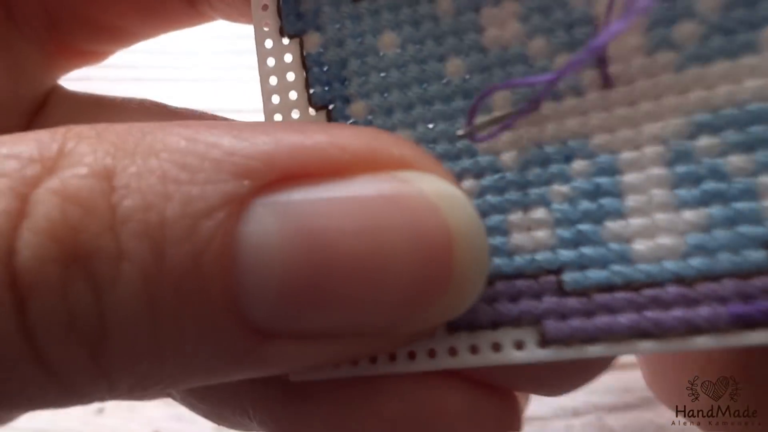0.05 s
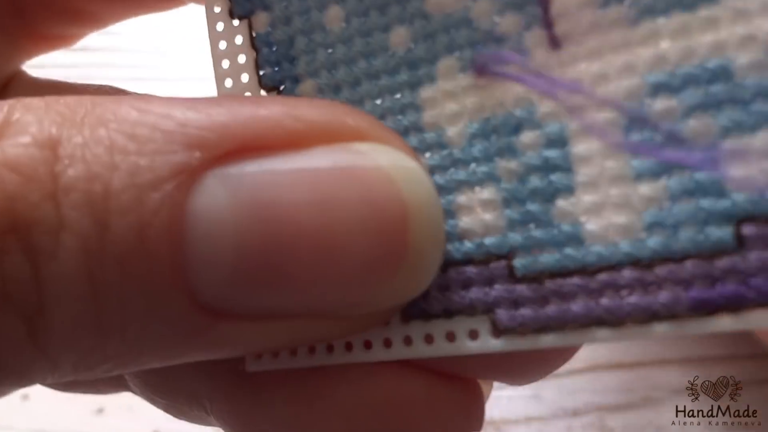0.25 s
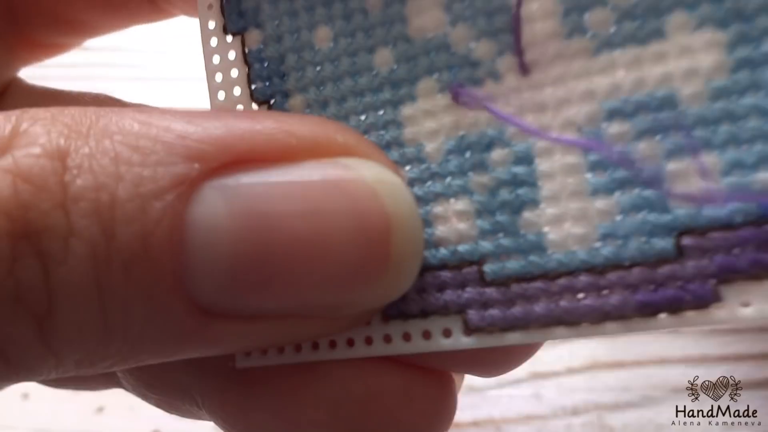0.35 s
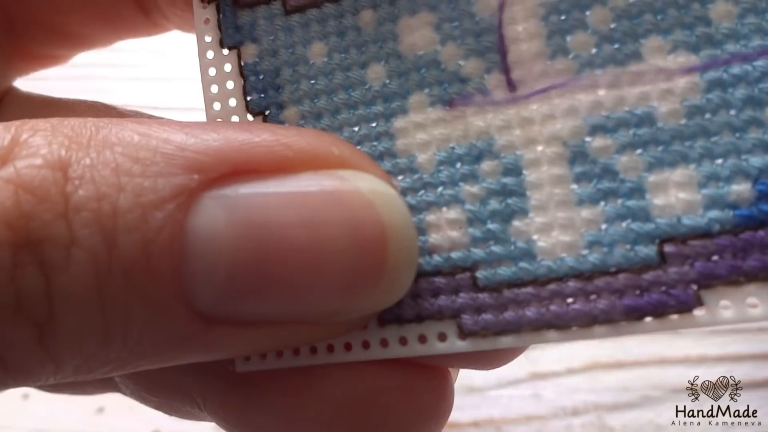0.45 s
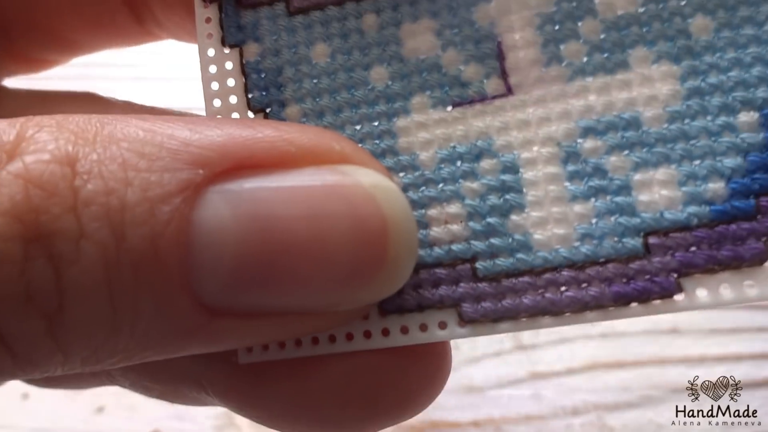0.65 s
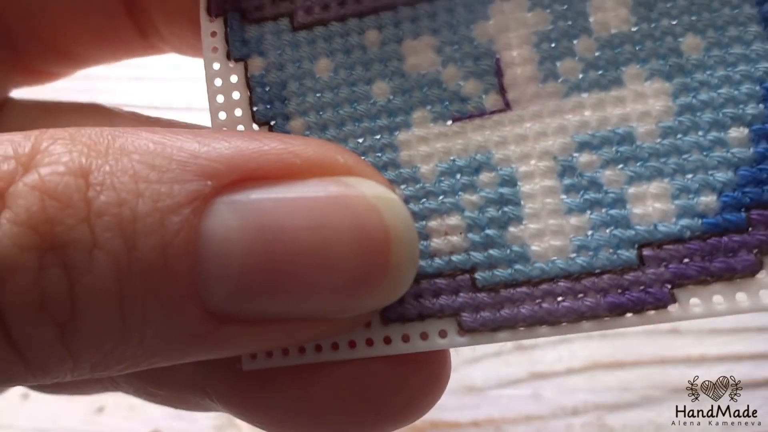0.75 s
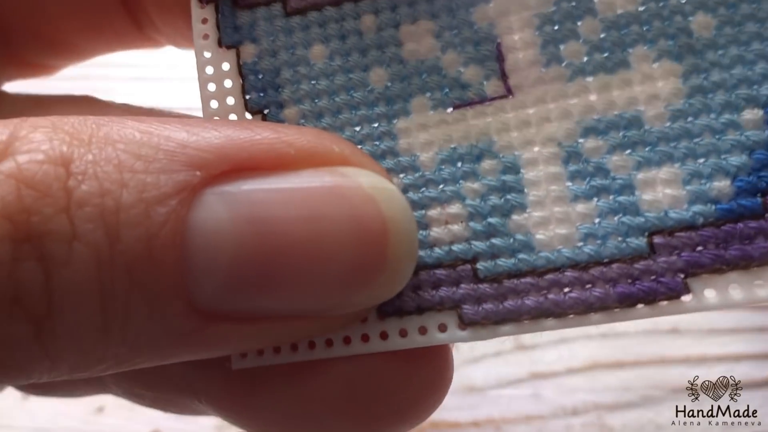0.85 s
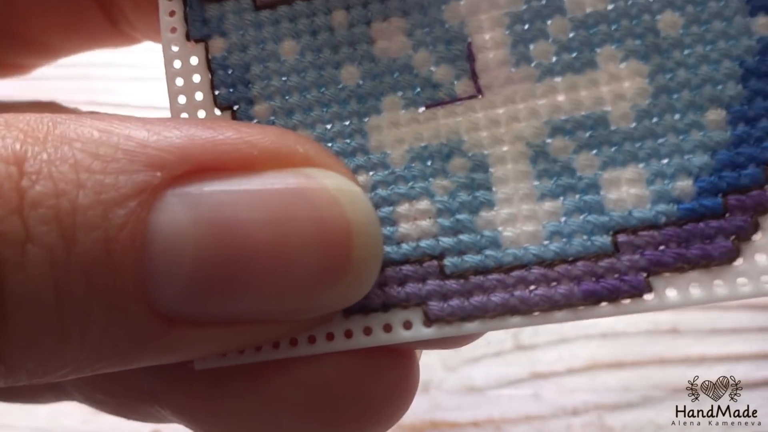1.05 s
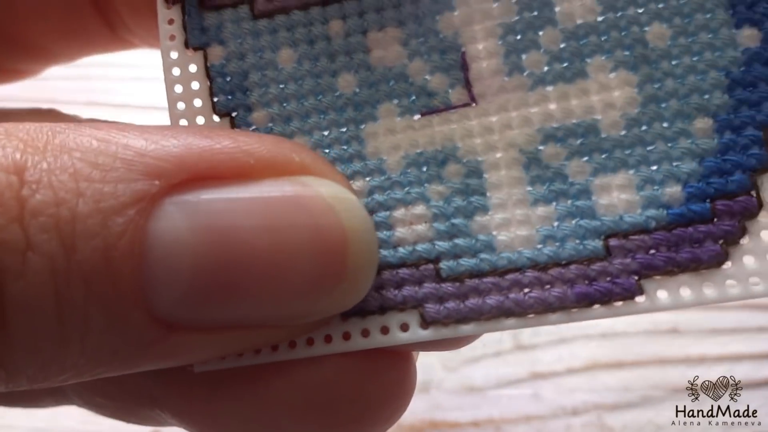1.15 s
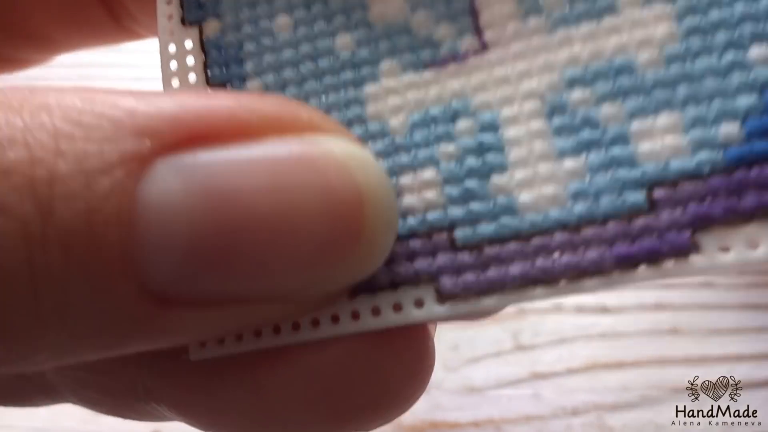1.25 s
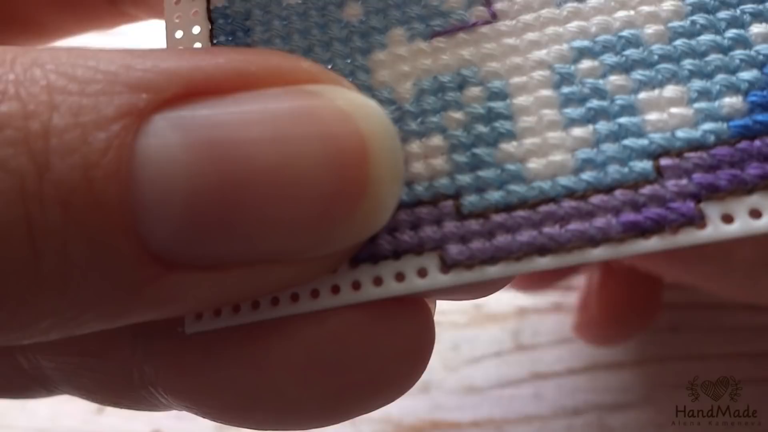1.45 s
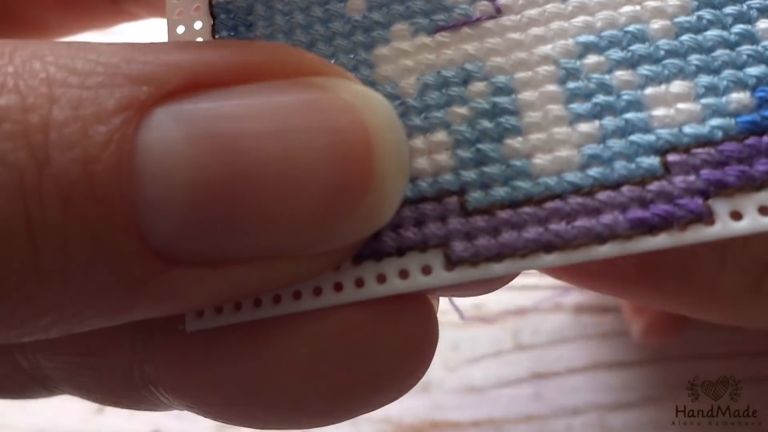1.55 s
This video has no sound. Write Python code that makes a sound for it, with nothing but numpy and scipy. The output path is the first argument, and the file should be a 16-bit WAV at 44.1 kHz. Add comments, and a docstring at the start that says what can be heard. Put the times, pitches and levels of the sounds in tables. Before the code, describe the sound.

Thread is pulled through stiff plastic canvas with a short rasp, plucks and dry ticks.

```python
"""In a small, dry room, thread is drawn through stiff plastic canvas a hand's width from the microphone.
It rasps in the hole, plucks the canvas as it tightens (twice strongly), jerks through in a few squeaks
as it sticks and slips, then slides on with a faint hiss. Needle and canvas touch with small dry ticks.
Under it all lies the recorder's own steady noise."""
import sys
import numpy as np
from scipy import signal
from scipy.fft import rfft, irfft
from scipy.io import wavfile
from scipy.ndimage import uniform_filter1d, map_coordinates

SR = 44100
rng = np.random.default_rng(int(sys.argv[2]) if len(sys.argv) > 2 else 0)


def to_wav(sig):
    """Store sig (one row per channel, or 1-D mono) as 16-bit WAV at the path in sys.argv[1].

    Samples outside -1..1 are clipped; the rate is SR.
    """
    pcm = np.clip(np.atleast_2d(sig), -1, 1) * 32767
    pcm = np.round(pcm).astype(np.int16)
    wavfile.write(sys.argv[1], SR, pcm.T)  # frames by channels


N = 70560
T = np.arange(N) / SR


def rasp(fibres_per_s=1800, scatter_db=3.5, ring_db=-7):
    """Fibres catch on the rim of the hole, louder and sharper as the thread is pulled."""
    # how the pull drives the rasp (time [s], body level [dB], sharp edge level [dB])
    pull = [(0, -55, -74), (.11, -59.5, -51.5), (.16, -56.5, -70), (0.208, -49.5, -60), (.219, -42, -53),
            (0.246, -36.5, -45.5), (0.279, -42.5, -36.5), (.3, -38, -36.5), (0.311, -28.5, -37.5),
            (0.327, -27, -39.5), (0.341, -42, -36.5), (0.361, -42.5, -45), (0.379, -52, -47.5),
            (.43, -54.5, -76), (.52, -55.5, -52.5), (.6, -67.5, -73.5)]
    # tone of the rasp's body (frequency [Hz], level [dB])
    body_tone = [(40, -35), (100, -15), (160, -5.5), (250, -12.5), (500, -9.5), (800, -2.5), (1250, 1.5),
                 (1800, -6), (3200, -9.5), (5500, -31), (15500, -38)]
    # tone of its sharp edge (frequency [Hz], level [dB])
    edge_tone = [(200, -14.5), (2000, -2), (3700, 3.5), (6000, -9), (8000, -16), (11500, -11),
                 (15500, -24.5)]
    catches = rng.random(N) < fibres_per_s / SR
    fibres = catches * undb(scatter_db * rng.standard_normal(N)) * rng.choice([-1, 1], N)
    body = unit(through(fibres, response(body_tone))) * swell([(s, db) for s, db, _ in pull])
    edge = unit(through(fibres, response(edge_tone))) * swell([(s, db) for s, _, db in pull])
    return body + edge + undb(ring_db) * canvas_ring(body + edge)


def plucks(size=2048):
    """The thread tugs the canvas and lets go: one swing that dies almost at once."""
    # tugs on the canvas (time [s], peak level [dB], pitch [Hz])
    tugs = [(0.019, -40, 322), (0.1158, -22, 846), (0.118, -25.5, 880), (0.1225, -26.5, 716),
            (0.129, -29, 324), (0.189, -33, 430), (0.2158, -7, 992), (0.221, -27, 330),
            (0.2871, -1.5, 1080), (0.2898, -13, 350), (0.2945, -18.5, 400), (0.3048, -9, 1270),
            (0.3080, -13.5, 620), (.3240, -17, 800), (.3290, -22, 926), (0.3539, -19, 734),
            (0.4013, -21, 1220), (0.4046, -23.5, 760), (0.4860, -34.5, 250)]
    out = np.zeros((2, N))
    soften = signal.butter(3, 2360, fs=SR, output="sos")
    for start, db, hz in tugs:
        swing = signal.sosfilt(soften, resonate(signal.unit_impulse(size), hz, width_hz=hz))
        add_contact(out, start, undb(db) * swing / np.abs(swing).max(), ring_db=-12)
    return out


def jerks(scatter_db=1.5, size=1024):
    """The thread sticks and slips in short runs that swell and die; evenly spaced slips squeak."""
    # runs of slips (time [s], length [s], level [dB], rate [slips/s], unevenness [0-1])
    runs = [(0.115, 0.0022, -27.5, 3450, 0.23), (0.186, 0.0024, -31.5, 1500, 0.2),
            (0.293, 0.0016, -17.5, 2100, 0.3), (0.3035, 0.0025, -2, 3700, .05),
            (0.305, 0.002, -11, 2600, 0.3), (0.312, .001, -6, 3400, 0.05),
            (0.314, 0.0012, -15.5, 6000, 0.1), (0.318, 0.001, -14, 3200, 0.1),
            (0.3234, 0.002, -16, 2900, 0.2), (0.3337, .0016, -20.5, 3100, 0.27),
            (0.3505, 0.0024, -24, 3600, 0.19)]
    # tone of one slip (frequency [Hz], level [dB])
    slip_tone = [(60, -17), (200, -15), (1200, -30), (2200, 6.5), (3700, 0), (5200, 0), (7000, -4),
                 (8500, -7), (11500, -9), (15500, -18)]
    out = np.zeros((2, N))
    slip = -response(slip_tone)
    for start, length, db, rate, uneven in runs:
        gap_luck, force_luck = rng.standard_normal((64, 2)).T
        times = (np.cumsum(np.exp(uneven * gap_luck)) - .5) / rate
        force = np.sin(np.pi * np.minimum(times / length, 1)) * undb(db + scatter_db * force_luck)
        squeak = signal.fftconvolve(impulses(times, force)[:size], slip)
        add_contact(out, start, squeak, ring_db=-5.5)
    return out


def ticks(low_cut_hz=680):
    """Needle and canvas meet in sharp, dry clicks that set the canvas ringing."""
    # touches (time [s], level [dB], extra ring [dB], brightness above 1 kHz [dB/octave])
    touches = [(0.0802, -8.5, -3.5, 0.5), (.1700, -14.5, 1, 1), (0.2119, -12.5, -18, 1),
               (0.2239, -26.5, 0, 2), (0.2881, -10.5, -7, -5.5), (.3141, 2, -6, 3.5), (0.3151, -3, -2, 2),
               (.3983, -10, 0.5, 1.5), (.4430, -27.5, -11, 0), (0.4817, -21, -18, -2),
               (0.8254, -27, 0.5, -1), (0.869, -31, -7, -1), (1.3710, -33.5, -3, -3),
               (1.4348, -21.5, -3, -1.5), (1.5006, -29.5, -2.5, -4.5)]
    # tone of one tick (frequency [Hz], level [dB])
    tick_tone = [(150, -7.5), (550, -3), (1100, -0.5), (1500, -1), (2050, -4.5), (2750, 3.5), (4800, 1.5),
                 (6300, -4), (8500, -7.5), (10800, -5.5), (15500, -18.5)]
    out = np.zeros((2, N))
    # a light touch hardly moves the canvas at low pitches
    cut_bass = signal.butter(2, low_cut_hz, "high", fs=SR, output="sos")
    for start, level_db, extra_ring_db, bright in touches:
        tone = [(hz, db + bright * np.log2(max(hz / 1000, 1))) for hz, db in tick_tone]
        click = signal.sosfilt(cut_bass, -response(tone))
        add_contact(out, start, undb(level_db) * click, ring_db=extra_ring_db - 1.5)
    return out


def sliding_hiss():
    """The thread hisses faintly as it slides through the hole."""
    # loudness of the slide (time [s], level [dB])
    loudness = [(0, -44), (.05, -55), (.15, -56.5), (.22, -54.5), (.28, -62), (.36, -41.5), (.45, -53),
                (.52, -52), (.6, -55), (.74, -58.5), (.8, -62.5), (1.3, -81), (1.45, -59), (1.6, -59)]
    # tone of the hiss (frequency [Hz], level [dB])
    tone = [(60, -22.5), (170, -11), (340, 0.5), (700, -6.5), (1400, -3), (2300, -5.5), (4500, -8.5),
            (8000, -13.5), (10500, -9.5), (15500, -22)]
    return spread(noise(tone), undb(-12) * noise(tone)) * swell(loudness)


def canvas_ring(x, canvas_s=0.027, room_s=0.067, note_cycles=50, size=8192):
    """The canvas answers with its own notes and a short blur, new at each touch; the room adds a tail."""
    # notes of the held canvas (pitch [Hz], relative level [dB])
    canvas_notes = [(352, -9.5), (812, -8.5), (979, 15.5), (1194, 6), (1340, 3.5), (1625, -36), (2790, 1),
                    (3900, -7)]
    # tone of the blur (frequency [Hz], level [dB])
    blur_tone = [(60, -13), (160, 6.5), (370, 11), (800, 0.5), (1300, 5.5), (2100, -4), (3600, -9),
                 (6000, -10), (10000, -10), (15500, -9.5)]
    t = T[:size]
    # canvas_s, room_s and note_cycles each say how long a 60 dB fade takes
    fade = undb(-60 * t / canvas_s) + undb(-23 - 60 * t / room_s)
    fade *= np.minimum(t / .001, 1)
    colour = response(blur_tone)
    white = rng.standard_normal((2, size + len(colour) - 1))
    mid, side = (unit(signal.fftconvolve(w, colour, "valid") * fade) / np.sqrt(size) for w in white)
    age = np.maximum(t - 0.00094, 0)  # the notes start just after the touch
    notes = sum(undb(db - 57.5 - 60 * age * hz / note_cycles) * np.sin(2 * np.pi * hz * age)
                for hz, db in canvas_notes)
    return spread(signal.fftconvolve(x, mid + notes), undb(-18.5) * signal.fftconvolve(x, side))[:, :N]


def recorder_noise(whine_hz=15750):
    """A steady hiss, each microphone's own resonances and a thin electrical whine."""
    # tone of the hiss both sides share (frequency [Hz], level [dB])
    mid_tone = [(40, -29.5), (115, -30), (155, -6), (195, -11.5), (300, -2.5), (700, -3.5), (1100, -11),
                (2100, 5), (2800, -10.5), (3600, -8.5), (7500, -14.5), (15500, -15)]
    # tone of the hiss that gives width (frequency [Hz], level [dB])
    side_tone = [(40, -41.5), (150, -16.5), (400, 1), (800, 5), (2100, 2), (3000, -6.5), (5000, -14),
                 (8000, -23), (15500, -41.5)]
    # resonances of the left microphone (pitch [Hz], width [Hz], level [dB])
    left = [(1538, 200, -52.5), (1455, 390, -53.5), (1124, 270, -60)]
    # resonances of the right microphone (pitch [Hz], width [Hz], level [dB])
    right = [(1264, 290, -59), (1920, 600, -70.5)]
    hiss = spread(undb(-60) * noise(mid_tone), undb(-56) * noise(side_tone))
    whine = undb(-75.5) * unit(np.sin(2 * np.pi * whine_hz * T))
    return hiss + np.array([microphone_noise(left), microphone_noise(right)]) + whine


def microphone_noise(resonances):
    """Noise rings at the pitches one microphone favours, wavering gently."""
    out = np.zeros(N)
    for hz, width_hz, db in resonances:
        band = resonate(rng.standard_normal(N), hz, width_hz)
        out += undb(db) * unit(resonate(band, hz, width_hz))
    return waver(out)


def waver(x, depth=0.015, rate_hz=7.07):
    """Let all pitches of a sound drift slowly up and down together."""
    span = int(SR / rate_hz)
    drift = unit(uniform_filter1d(uniform_filter1d(rng.standard_normal(N), span), span))
    speed = 1 + depth * (drift - drift.mean())
    return map_coordinates(x, [np.cumsum(speed)], mode="mirror")


def add_contact(out, start_s, contact, ring_db):
    """Add one contact and the canvas's ring to the track."""
    sound = undb(ring_db) * canvas_ring(contact)
    sound[:, :len(contact)] += contact
    start = int(np.clip(start_s * SR, 0, N - 1))
    out[:, start:start + sound.shape[1]] += sound[:, :N - start]


def undb(db):
    """Turn decibels into a multiplier."""
    return 10 ** (np.asarray(db) / 20)


def unit(x):
    """Scale to an average (rms) level of 1."""
    return x / np.sqrt(np.mean(x ** 2))


def swell(curve):
    """Loudness over time from (time [s], level [dB]) points."""
    return undb(np.interp(T, *np.array(curve).T))


def response(tone, size=2048):
    """A click with the given tone and a peak of 1."""
    hz, db = np.array(tone).T
    freqs = np.maximum(np.arange(size // 2 + 1) * SR / size, 1)
    gains = undb(np.interp(np.log(freqs), np.log(hz), db))
    # folding the cepstrum packs the click's energy at its start (minimum phase)
    cepstrum = irfft(np.log(gains))
    cepstrum[1:size // 2] *= 2
    cepstrum[size // 2 + 1:] = 0
    click = irfft(np.exp(rfft(cepstrum)))
    return click / np.abs(click).max()


def through(x, click):
    """Give a sound the tone of a click."""
    return signal.fftconvolve(x, click)[:N]


def noise(tone):
    """Noise with the given tone, at an average level of 1."""
    return unit(through(rng.standard_normal(N), response(tone)))


def resonate(x, hz, width_hz):
    """Keep the band of a sound around one pitch."""
    g = np.tan(np.pi * hz / SR)
    k = g * width_hz / hz
    return signal.lfilter([k, 0, -k], [1 + k + g * g, 2 * (g * g - 1), 1 - k + g * g], x)


def impulses(times, sizes):
    """A track with one spike at each time."""
    samples = np.round(np.asarray(times) * SR).astype(int)
    return np.bincount(np.clip(samples, 0, N - 1), sizes, N)


def spread(mid, side):
    """Make left and right from a shared part (mid) and a widening part (side)."""
    return np.array([mid + side, mid - side])


def scene():
    """The stitching, slightly to the right, over the recorder's noise."""
    stitching = ticks() + plucks() + jerks() + rasp() + sliding_hiss()
    return stitching * undb([[-0.5], [0.5]]) + recorder_noise()


def record(dry, low_cut_hz=31, top_hz=16000):
    """The recorder thins the bass, clips at full scale and cuts the highest treble."""
    cut_bass = signal.butter(1, low_cut_hz, "high", fs=SR, output="sos")
    cut_top = signal.ellip(10, .2, 90, top_hz, fs=SR, output="sos")
    clipped = np.clip(signal.sosfilt(cut_bass, dry), -1, 1)
    return signal.sosfilt(cut_top, clipped)


dry = scene()
out = record(dry)
to_wav(out)
```